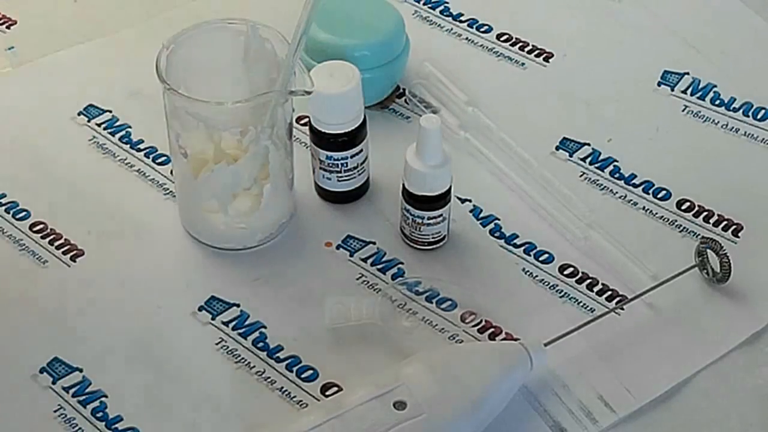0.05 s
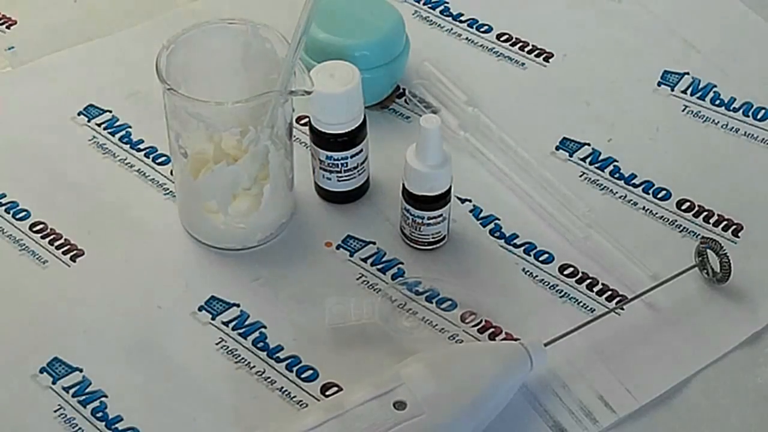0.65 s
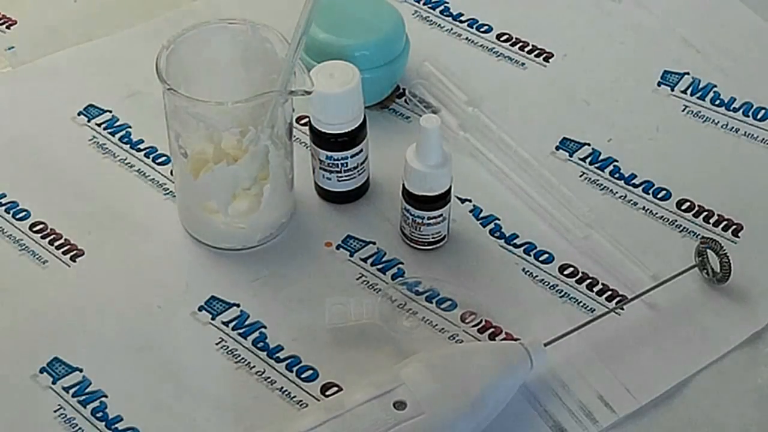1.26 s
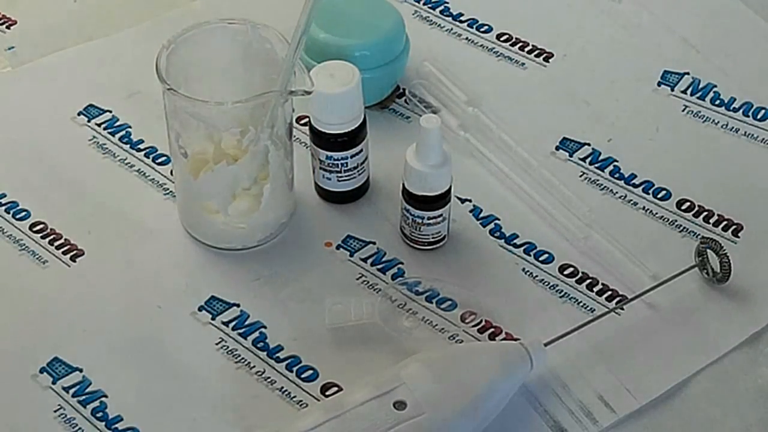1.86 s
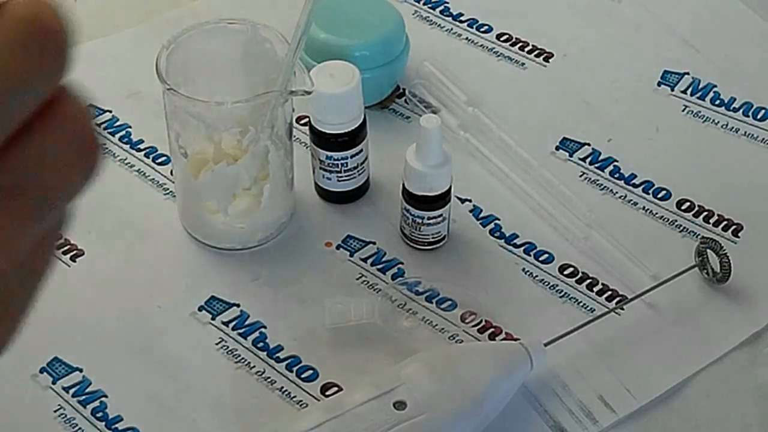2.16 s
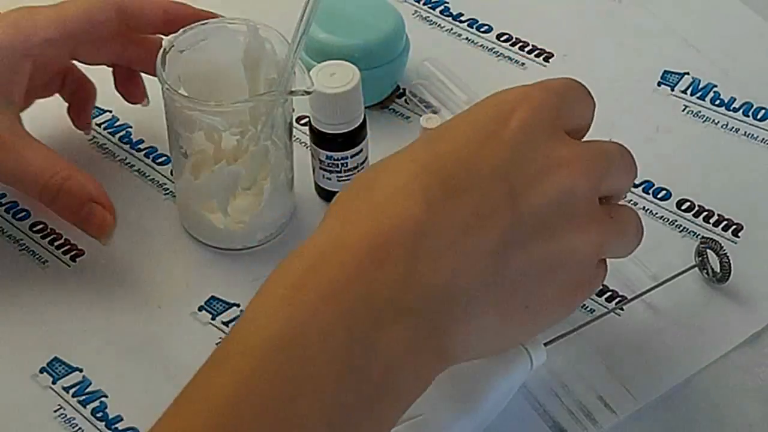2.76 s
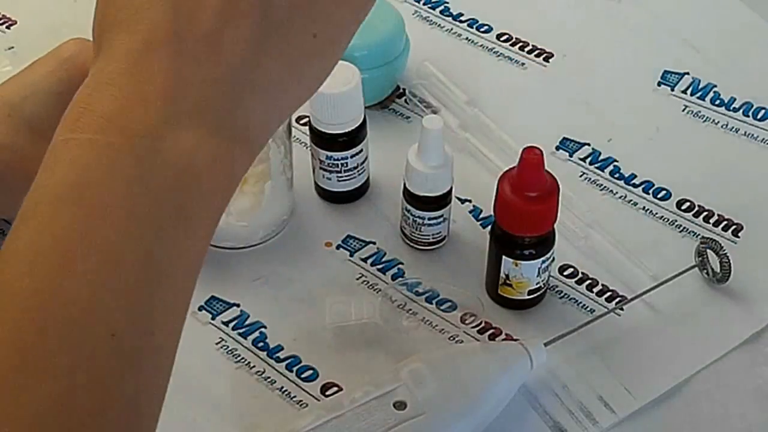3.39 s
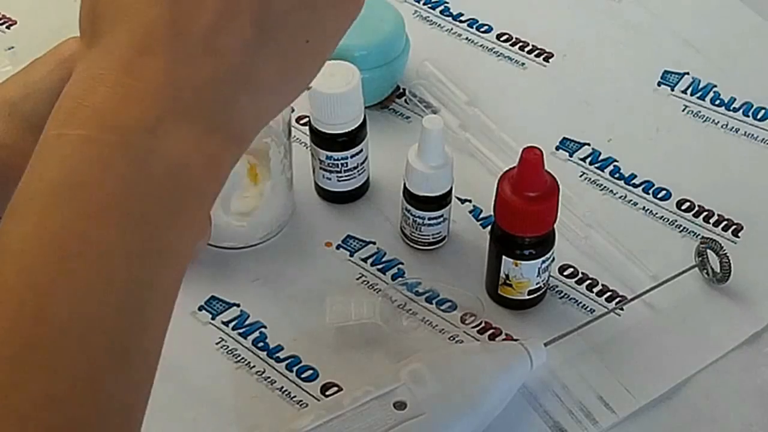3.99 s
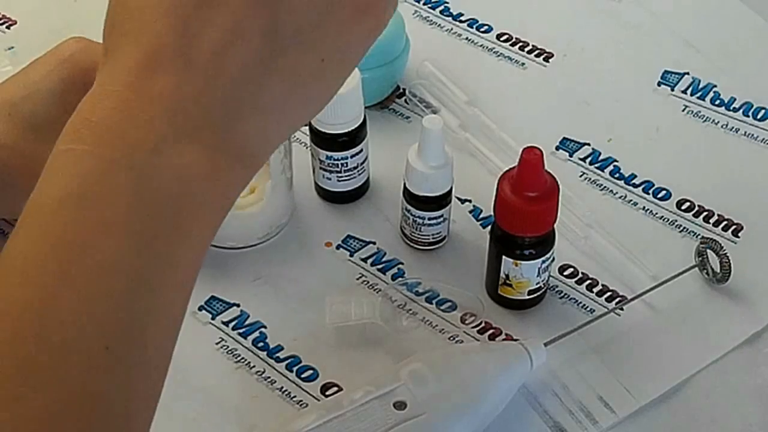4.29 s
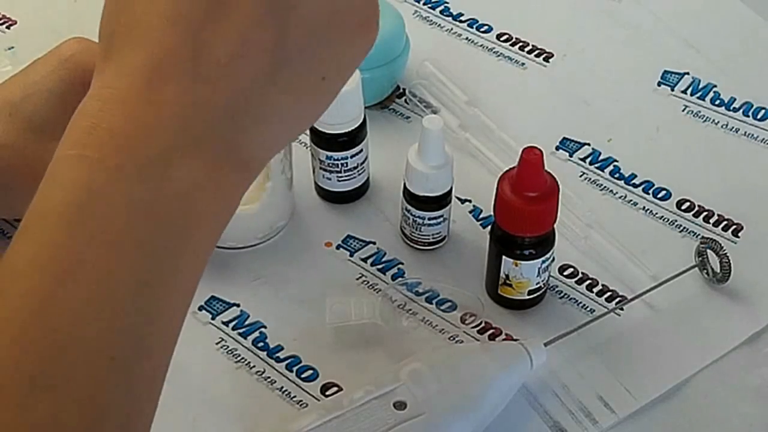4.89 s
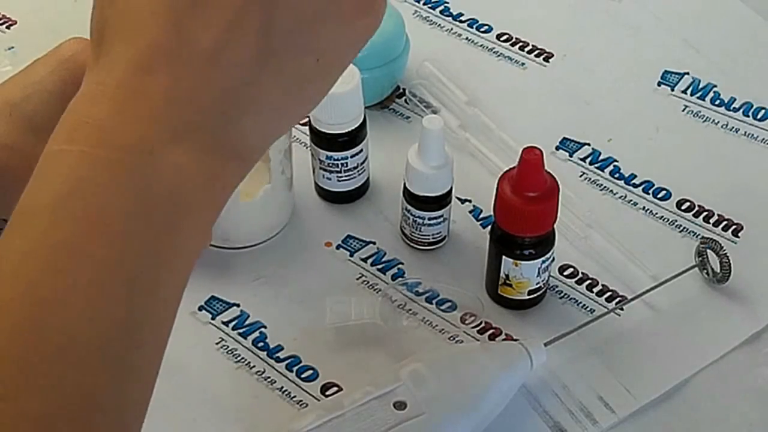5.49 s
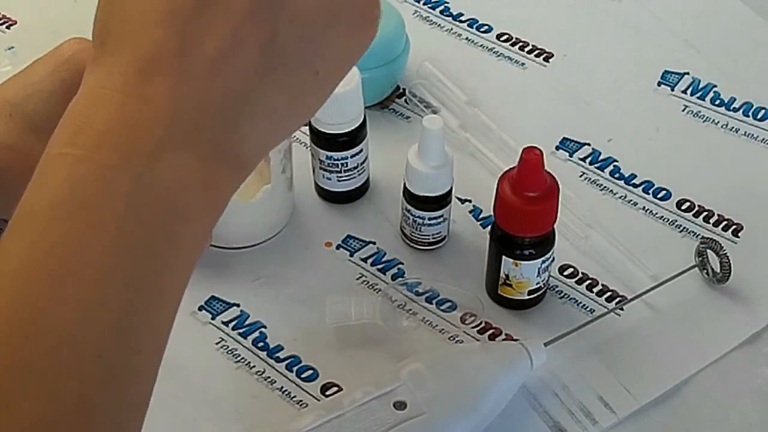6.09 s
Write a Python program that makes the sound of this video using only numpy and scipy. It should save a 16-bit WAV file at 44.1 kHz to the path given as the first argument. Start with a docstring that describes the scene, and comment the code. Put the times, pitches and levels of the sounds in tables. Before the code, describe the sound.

Small bottles are handled on a table, heard close up in a small room with a short echo, faint hiss and softened treble. Sleeves rustle quietly throughout. A soft thud comes at 0.2 seconds, then a few light clicks and tiny scrapes between 0.5 and 1.4 seconds. Near 2 seconds an arm passes with a faint, falling whoosh. Dull bumps and small taps follow from 2.3 to 3.5 seconds, with a slight low rumble from the table. At about 3.6 seconds a glass beaker is knocked with a clear, briefly ringing clink, and the heaviest thuds follow until 4.1 seconds. From 4.4 to 5.5 seconds caps and glass click busily among short, faintly squeaky scrapes, with a weak beaker clink near 4.5. A sharp click with a knock and a slight ring lands at 5.8 seconds, and a few lighter ticks follow just after 6.

```python
"""Small dropper bottles are handled beside a glass beaker on a paper-covered table, in a small room.
Sleeves rustle over a faint hiss. Caps and glass click as they meet, hands thud on the table, and
plastic and skin scrape in tiny slips. A leaning arm sways the table top, and near 2 s an arm whooshes
past. From about 3.6 s the beaker is knocked four times and rings on. The room echoes after each touch,
and a close microphone that loses the high treble hears it all."""
import sys
import numpy as np
from scipy import signal
from scipy.fft import rfft, irfft
from scipy.io import wavfile
from scipy.ndimage import uniform_filter1d

SR = 44100
rng = np.random.default_rng(int(sys.argv[2]) if len(sys.argv) > 2 else 0)


def to_wav(s):
    """Save 16-bit WAV."""
    ch = np.atleast_2d(s).T  # columns
    pcm = np.round(np.clip(ch, -1, 1) * 32767)  # PCM
    wavfile.write(sys.argv[1], SR, pcm.astype(np.int16))


N = 275625
TIME = np.arange(N) / SR

# Levels are relative. A ring time is how long a sound takes to fade by 60 dB.
# How briskly sleeves and skin move through the air and over paper: (time [s], level [dB])
RUSTLE_LEVELS = [(0, -90), (.25, -57.5), (.42, -65.5), (.6, -55), (1.02, -63), (1.45, -56), (1.72, -63),
                 (1.95, -60), (2.3, -59), (2.9, -59), (3.9, -55), (4.7, -60.5), (5.05, -55.5),
                 (5.32, -64.5), (5.5, -61), (5.68, -64), (5.9, -61), (6.25, -57)]
# The tone of that rustle: (frequency [Hz], level [dB])
RUSTLE_TONE = [(88, -43.5), (150, -6), (249, -20), (270, -18), (556, -7.5), (665, -14), (879, -5),
               (1020, -10), (1560, -3), (1840, -11), (2590, -9.5), (3310, -16.5), (7500, -24),
               (9750, -69.5), (16500, -120)]
# Borders of the seven bands that shape a click or scrape: (frequency [Hz])
BAND_EDGES = [360, 750, 1400, 2200, 3100, 3900, 4900, 7600]
# The tone all clicks and scrapes share, one row a band: (frequency [Hz], level [dB])
TOUCH_TONE = [(433, -5.33), (1025, -3), (1755, 0.93), (2610, -3.13), (3480, 0.5), (4370, -1.9),
              (6100, -1.97)]
# The notes of the handled glass: (frequency [Hz], level [dB], ring time [s])
GLASS_NOTES = [(1195, -23, 0.038), (1272, 2.5, 0.02), (1744, -28, 0.12), (1960, -8, 0.013),
               (2556, -3.5, 0.035), (2810, -2, 0.12), (3310, -24, 0.011), (4220, -1.5, 0.0089),
               (4470, -21.5, 0.09), (5246, 1, 0.0054), (6010, -25, 0.016), (6535, -4, 0.015)]
# Hard touches: (time [s], decay [s], level [dB], brightness [dB per octave], bass edge [Hz],
# lower note [Hz], its boost [dB], upper note [Hz], its boost [dB])
CLICK_EVENTS = [(0.052, 0.015, -83, 1.5, 200.0, 3770.0, 17, 4760, 21.5),
                (0.1839, 0.021, -57, 3.7, 200.0, 1900.0, 6.5, 3230, 6.2),
                (0.503, 0.0034, -60.5, -10.9, 2010.0, 2230.0, 10, 3662.0, 0),
                (0.5251, 0.00093, -34.8, -9.5, 2200, 1580.0, 10, 2340, 12.5),
                (0.7277, 0.00032, -64, 0, 200.0, 1540.0, 14.5, 2920.0, 8),
                (0.7683, 0.0019, -41, 1.9, 1070, 1690, 3, 2716, 8),
                (1.2104, 0.0089, -59.5, 0.9, 1070, 1230, 11, 1496, 7),
                (1.3681, 0.00077, -43.5, -5.5, 1190, 1950.0, -4.5, 4120, 4),
                (2.2828, 0.024, -58.5, 9.5, 200.0, 4160.0, -0.5, 6360.0, -5.5),
                (2.3793, 0.019, -53.5, 4.5, 200.0, 3670.0, 8.3, 4050, 4.5),
                (3.1069, 0.008, -45, 5.5, 230.0, 1930, 7, 4980, 4.5),
                (3.1758, 0.025, -54.5, 1, 480.0, 1970, 2, 5870, 6.7),
                (3.2686, 0.017, -53.0, 4, 450.0, 3940, 2, 6050, 0.5),
                (3.3607, 0.012, -51.1, 9.5, 200.0, 4100.0, 0.5, 5650, -7),
                (3.571, 0.0012, -30.5, 1, 715, 2828, 11.5, 4520, 5.5),
                (3.6352, 0.008, -43, -12.5, 1740.0, 1270, 4, 2770, 5.5),
                (3.722, 0.0081, -50, 3, 500.0, 1690, 5.6, 3900, -2),
                (3.86, 0.02, -63, 0, 200.0, 1215, 13.5, 3940, 6),
                (4.063, 0.0066, -49.5, -1.9, 585, 4790.0, 6, 5490, 10),
                (4.3876, 0.0075, -49, -2.5, 1490.0, 2470, 15, 5270, 11.5),
                (4.4611, 0.0041, -35.5, 1.1, 500.0, 1194, 4, 2470, 7.5),
                (4.568, 0.002, -34.5, -0.3, 1740, 3180, 0, 5040, 4),
                (4.6252, 0.00061, -42, 2.7, 380.0, 4190, 14, 5500, 10.5),
                (4.756, 0.0051, -41, -0.7, 1360.0, 2725, 8, 5330, 7.5),
                (4.767, 0.001, -41.5, -5.8, 1280.0, 2610, 12, 3480, -9),
                (4.9012, 0.0018, -42, 5, 200.0, 1040, 16, 2650, 14),
                (5.0152, 0.012, -43.5, 0.9, 880, 3320, 2, 5180, 4.5),
                (5.1181, 0.0075, -58.5, 0, 595, 1100, 19, 1670, 8.5),
                (5.2565, 0.011, -51.5, 1.3, 1080.0, 1747.0, 7.5, 5080, 8),
                (5.371, 0.011, -50.5, 1, 1000, 1547, 4.5, 3470, -3),
                (5.459, 0.0012, -61.5, 13, 580.0, 1750.0, 20.0, 4830, 8),
                (5.7852, 0.0037, -31, 1.75, 362, 1184, 3, 2840, 2),
                (6.0553, 0.0054, -40, 1.5, 980.0, 1400, 1, 5100, 8),
                (6.172, 0.0021, -43, -0.7, 1890, 3300.0, -2, 5050, 3.8),
                (6.229, 0.0017, -48, -2.2, 740.0, 1960.0, -3.5, 5300, 4)]
# Soft blows on the table: (time [s], swell [s], thud [Hz], thud level [dB], knock [Hz], knock level [dB])
THUD_EVENTS = [(0.177, 0.024, 103.6, -48, 190, -38), (0.195, 0.017, 71.4, -40.5, 280, -44.5),
               (1.093, 0.021, 243.4, -55, 255, -71), (1.144, 0.026, 237.4, -58, 129, -54),
               (2.283, 0.0078, 69.6, -47, 446, -47), (2.383, 0.012, 75, -51, 405, -45.5),
               (2.583, 0.0084, 78, -37, 398, -36.5), (2.669, 0.01, 155, -37.5, 408, -32),
               (2.676, 0.011, 107, -38.5, 250, -47), (3.146, 0.0064, 93, -38, 446, -43.5),
               (3.27, 0.012, 87, -40.5, 450, -55.5), (3.362, 0.013, 83, -43.5, 450, -45),
               (3.521, 0.031, 80, -48, 620, -56), (3.662, 0.0069, 70, -60, 410, -36.5),
               (3.679, 0.0079, 90, -25.5, 266, -33), (3.746, 0.0075, 79, -27.5, 388, -36),
               (3.869, 0.011, 64.6, -34, 770, -47), (3.901, 0.013, 98, -32, 440, -54),
               (3.931, 0.012, 65, -33, 610, -51), (4.017, 0.015, 96.5, -29.5, 420, -47.5),
               (4.06, 0.01, 75, -38.5, 437, -70), (4.456, 0.027, 90, -42, 278, -52),
               (4.675, 0.024, 77, -48, 395, -62), (4.766, 0.015, 87, -50, 287, -49),
               (5.469, 0.014, 71, -49, 398, -54), (5.785, 0.0084, 107, -52, 766, -36.5),
               (5.79, 0.014, 70, -53, 517, -45)]
# Plastic and skin sliding: (start [s], end [s], level [dB], brightness [dB per octave],
# bass edge [Hz], squeak boost [dB], squeak [Hz])
SCRAPE_EVENTS = [(0.515, 0.529, -43.5, -8.5, 1640, 6, 2240.0), (0.755, 0.776, -48.5, -2.2, 735, 6.5, 1780),
                 (1.059, 1.246, -78.5, 6, 201, 16.5, 1660.0),
                 (2.557, 2.592, -60.5, -2.5, 200.0, 0.5, 760.0),
                 (2.588, 2.606, -49.5, -7.0, 764, 4.5, 690.0), (3.525, 3.547, -57.5, -7, 537, 8.5, 630),
                 (3.739, 3.756, -49.5, -0.8, 420.0, 5, 1280), (4.069, 4.109, -59, 2.8, 530.0, 16, 3100),
                 (4.59, 4.598, -60, -1.5, 1000.0, 16, 3000), (4.776, 4.8, -46, -4.5, 1820, 11.5, 2530),
                 (4.799, 4.821, -48.5, 5.5, 200.0, 14, 1750), (4.828, 4.85, -48.5, 4, 660.0, 8.5, 4140),
                 (4.939, 4.956, -54.5, -5.5, 1570.0, 14, 4580.0), (5.148, 5.224, -56, 1, 473, -6, 1250),
                 (5.385, 5.501, -57, -1.6, 1140.0, 3.5, 4800)]
# An arm leans on the table: (start [s], end [s], level [dB])
ARM_LEANS = [(1.1, 1.587, -57.5), (2.25, 2.63, -52.5), (2.994, 3.55, -55), (3.606, 4.032, -48),
             (4.122, 4.512, -57), (4.62, 4.814, -53), (5.834, 6.042, -72)]
# An arm sweeps past the microphone: (time [s], level [dB], whoosh pitch [Hz])
SWEEP_PATH = [(1.8, -88, 641), (1.977, -59, 550), (2.098, -63.5, 510), (2.24, -64, 447), (2.36, -66, 404)]
# The brushing that goes with it: (frequency [Hz], width [Hz], level [dB])
SWEEP_BRUSHING = [(885, 40, -5), (1540, 91, -7.5), (2656, 32, -7)]
# Knocks against the beaker: (time [s], level [dB])
BEAKER_HITS = [(3.572, -27), (3.638, -47.5), (4.462, -52), (5.788, -50)]
# The notes of the beaker: (frequency [Hz], level [dB], ring time [s])
BEAKER_NOTES = [(1137, -5, 0.25), (1220, -3.5, 0.15), (2650, -12.5, 0.18), (2860, -1.5, 0.16),
                (3000, 1, 0.16), (2920, -5.5, 0.14), (3153, -14, 0.28), (4290, -24.5, 0.2),
                (4520, -4.5, 0.1)]
# The tone of the room's echo: (frequency [Hz], level [dB])
ROOM_TONE = [(100, 9.5), (400, 8), (1100, 9), (2000, 0), (3000, 0), (4500, -2.5), (7000, -4.5)]
# How long the room rings: (frequency [Hz], ring time [s])
ROOM_RING_TIMES = [(200, 0.66), (530, 0.48), (1400, 0.31), (3500, 0.43), (7000, 0.42)]
# Pitches the room favours: (frequency [Hz], width [Hz], boost [dB])
ROOM_RESONANCES = [(430, 44, 9.8), (810, 32, 4.9), (1176, 68, 5.4), (2420, 86, 1)]
# The whole sound dips briefly: (start [s], end [s], level change [dB])
LEVEL_DIPS = [(0, 0.05, -20), (0.466, 0.496, -14), (5.713, 5.759, -22.5)]


def amp(db):
    """Turns decibels into a number to multiply by."""
    return 10 ** (np.asarray(db) / 20)


def unit(x):
    """Scales a signal to an average strength (rms) of 1."""
    return x / np.sqrt(np.mean(x ** 2) + 1e-20)


def look_up(points, hz):
    """Reads between the rows of a (frequency, value) table, with octaves evenly spaced."""
    row_hz, value = np.transpose(points)
    return np.interp(np.log(hz + 1), np.log(row_hz), value)


def add(mix, start_s, sound):
    """Mixes a sound in at the given time."""
    part = mix[max(round(start_s * SR), 0):][:len(sound)]
    part += sound[:len(part)]


def resonate(x, hz, width_hz):
    """Makes x ring at one pitch; the narrower the width, the longer it rings."""
    fade = np.exp(-np.pi * width_hz / SR)
    return 2 * signal.lfilter([1 - fade], [1, -fade * np.exp(2j * np.pi * hz / SR)], x).real


def narrow(x, hz, width_hz):
    """Resonates twice, leaving little but a narrow band."""
    return resonate(resonate(x, hz, width_hz), hz, width_hz)


def rustle(patchy_db=4, level_db=-2):
    """Sleeves and skin rustle softly, with the patchy flutter that a noise suppressor gives."""
    hz, _, spectra = signal.stft(rng.standard_normal(N), SR, nperseg=1024, noverlap=768)
    patch_shape = np.ones((3, 14))  # frequency steps by time steps
    patches = unit(signal.convolve2d(rng.standard_normal(spectra.shape), patch_shape, "same"))
    spectra *= amp(look_up(RUSTLE_TONE, hz)[:, None] + patchy_db * patches)
    rubbing = signal.istft(spectra, SR, nperseg=1024, noverlap=768)[1][:N]
    return amp(level_db + np.interp(TIME, *np.transpose(RUSTLE_LEVELS))) * unit(rubbing)


def band_of(hz):
    """Finds which of the seven bands holds a frequency."""
    return np.searchsorted(BAND_EDGES[1:-1], hz)


def touch_bands(db, brightness, bass_hz, notes, bass_cut_db_per_octave=19):
    """Band levels of one touch: a harder one is brighter, and a smaller part has less bass."""
    hz, shared_db = np.transpose(TOUCH_TONE)
    octaves_below = np.logaddexp2(0, 6 * np.log2(bass_hz / hz)) / 6  # eases to 0 above the bass edge
    band_db = db + shared_db + brightness * np.log2(hz / 2500) - bass_cut_db_per_octave * octaves_below
    for note_hz, boost_db in notes:
        band_db[band_of(note_hz)] += boost_db
    return band_db


def shape_tone(x, band_db, seconds, size=8192):
    """Where a thing is touched sets its tone: steers the opening seconds of x toward the band levels."""
    hz, spectrum = np.fft.rfftfreq(size, 1 / SR), rfft(x, size)
    bands = [irfft(spectrum * ((hz >= lo) & (hz < hi))) for lo, hi in zip(BAND_EDGES, BAND_EDGES[1:])]
    strengths = [np.std(band[:round(seconds * SR)]) for band in bands]
    gain = (amp(band_db) / strengths)[band_of(hz)]
    bass_cut = hz ** 4 / (hz ** 4 + BAND_EDGES[0] ** 4)
    log_gain = uniform_filter1d(np.log(gain * bass_cut + 1e-9), 41)
    mirrored = np.r_[log_gain, log_gain[-2:0:-1]]
    response = np.exp(np.conj(signal.hilbert(mirrored)))  # so nothing rings before x starts
    return irfft(spectrum * response[:len(hz)])


def glass(force, direct_db):
    """A force is heard directly and through the notes it wakes in the glass."""
    ringing = sum(amp(db) * resonate(force, hz, np.log(1000) / np.pi / ring_s)
                  for hz, db, ring_s in GLASS_NOTES)
    return amp(direct_db) * force + ringing


def held_part(force, notes_hz, direct_db, grip_width_hz=415, grip_db=-7.5):
    """A held part is struck: the glass answers, and fingers damp the part's own notes into broad ones."""
    damped = sum(unit(resonate(force, hz, grip_width_hz)) for hz in notes_hz)
    return unit(glass(force, direct_db)) + amp(grip_db) * damped


def clicks(direct_db=-8, pre_echo_db=-22, pre_echo_s=0.0034, note_db=-4, chatter_db=-2, size=4096):
    """Caps and glass chatter, with a faint pre-echo just before each click. Returns chatter and notes."""
    chatter, notes, t = np.zeros(N), np.zeros(N), np.arange(size) / SR
    for start, decay, db, brightness, bass_hz, low_hz, low_boost, high_hz, high_boost in CLICK_EVENTS:
        grit, pre_echo_noise = rng.standard_normal((2, size))
        band_db = touch_bands(db, brightness, bass_hz, [(low_hz, low_boost), (high_hz, high_boost)])
        attack = 1 - np.exp(-t / (0.00023 + decay / 10))  # a longer touch starts more gently
        contact = held_part(grit * attack * np.exp(-t / decay), [low_hz, high_hz], direct_db)
        add(chatter, start, shape_tone(contact, band_db, seconds=0.01))
        pre_echo = glass(pre_echo_noise * t * (t < pre_echo_s), direct_db)
        add(chatter, start - pre_echo_s, amp(pre_echo_db) * shape_tone(pre_echo, band_db, pre_echo_s))
        firmness_db = 0.18 * (db + 43)  # a firmer touch rings more
        ring_s = 0.027 + 2 * decay
        for hz in low_hz, high_hz:
            note = attack * np.sin(2 * np.pi * hz * t) * amp(-60 * t / ring_s)
            note /= np.std(note[:SR // 100])
            add(notes, start, amp(band_db[band_of(hz)] + note_db + firmness_db) * note)
    return amp(chatter_db) * chatter, notes


def thuds(knock_width_hz=220, legs_hz=30, legs_db=-5, size=16384):
    """A soft blow swings the table top and rocks its legs, while an object on it gives a dull knock."""
    out, t = np.zeros(N), np.arange(size) / SR
    for start, swell, thud_hz, thud_db, knock_hz, knock_db in THUD_EVENTS:
        push = (t / swell * np.exp(1 - t / swell)) ** 2
        knock = push * narrow(rng.standard_normal(size), knock_hz, knock_width_hz)
        knock = unit(knock) * np.sqrt(np.mean(push ** 2) / 2)  # as strong as a tone under this push
        swing = np.sin(2 * np.pi * thud_hz * t) + amp(legs_db) * np.sin(2 * np.pi * legs_hz * t)
        add(out, start, amp(thud_db) * push * swing + amp(knock_db) * knock)
    return out


def scrapes(slips_per_s=1200, spread_db=4, squeak_db=-3, level_db=-1, size=7168):
    """Plastic and skin slide in tiny, uneven slips that shake the glass and squeak faintly."""
    out, t = np.zeros(N), np.arange(size) / SR
    for start, end, db, brightness, bass_hz, boost_db, squeak_hz in SCRAPE_EVENTS:
        band_db = touch_bands(db, brightness, bass_hz, [(squeak_hz, boost_db)])
        slips = (rng.random(size) < slips_per_s / SR) * rng.standard_normal(size)
        slips *= amp(spread_db * rng.standard_normal(size))
        length = end - start
        stroke = np.sqrt(np.clip(np.sin(np.pi * np.minimum(t / length, 1)), 0, 1))
        force = (slips + 0.14 * rng.standard_normal(size)) * stroke
        squeak = unit(resonate(force, squeak_hz, width_hz=130))
        slide = unit(glass(force, direct_db=-12)) + amp(squeak_db) * squeak
        add(out, start, shape_tone(slide, band_db, length))
    return amp(level_db) * out


def table_sway(settle_s=0.06, fade_db_per_s=77, resting_db=-77.5, upper_db=-6):
    """The table top's two lowest notes swell as an arm leans on it and sink back when the arm lifts."""
    pressure = rng.standard_normal(N)
    lower = unit(narrow(pressure, hz=60, width_hz=14))
    upper = unit(narrow(pressure, hz=92, width_hz=98.6))
    strength = np.full(N, amp(resting_db))
    for start, end, db in ARM_LEANS:
        settling = np.clip((TIME - start) / settle_s, 0, 1)
        strength += settling * amp(db - fade_db_per_s * np.maximum(TIME - end, 0))
    return strength * unit(lower + amp(upper_db) * upper)


def arm_sweep(width_hz=100):
    """A passing arm stirs the air into a hollow whoosh that falls in pitch, with higher brushing."""
    times, db, hz = np.transpose(SWEEP_PATH)
    air = rng.standard_normal(N)
    cycles = np.cumsum(np.interp(TIME, times, hz)) / SR
    whoosh = unit(narrow(air, 0, width_hz) * np.sin(2 * np.pi * cycles))
    brushing = sum(amp(peak_db) * unit(narrow(air, peak_hz, width))
                   for peak_hz, width, peak_db in SWEEP_BRUSHING)
    passing = (TIME > times[0]) & (TIME < times[-1])
    return (whoosh + brushing) * amp(np.interp(TIME, times, db)) * passing


def beaker():
    """The knocked beaker stands free, so it rings longer than anything held in the fingers."""
    out, t = np.zeros(N), TIME[:SR // 2]
    for start, db in BEAKER_HITS:
        for hz, note_db, ring_s in BEAKER_NOTES:
            add(out, start, amp(db + note_db - 60 * t / ring_s) * np.sin(2 * np.pi * hz * t))
    return out


def room(x, tail_db=-5, early_db=-8, early_ring_s=0.045, echoes_per_s=2000, gap_s=0.0018):
    """Quick echoes come off nearby things, then blur into a tail that lasts longest in the bass."""
    t = TIME[:SR]
    hz, frame_s, spectra = signal.stft(rng.standard_normal(SR), SR, nperseg=256)
    spectra *= amp(-60 * frame_s / look_up(ROOM_RING_TIMES, hz)[:, None])
    tail = signal.istft(spectra, SR, nperseg=256)[1][:SR] * np.clip(t / gap_s - 1, 0, 1)
    hz = np.fft.rfftfreq(SR, 1 / SR)
    peaks_db = sum(db / (1 + (2 * (hz - peak_hz) / width) ** 2) for peak_hz, width, db in ROOM_RESONANCES)
    tail = irfft(rfft(unit(tail)) * amp(look_up(ROOM_TONE, hz) + peaks_db), SR)
    tail *= (t > gap_s) & (t < 0.9)
    early = rng.standard_normal(SR) * (rng.random(SR) < echoes_per_s / SR)
    early *= (t > gap_s / 2) * amp(-60 * t / early_ring_s)
    echoes = amp(tail_db) * tail + amp(early_db) * unit(early)
    return signal.fftconvolve(x, echoes)[:N] / np.sqrt(SR)


def table_bounce(x, delay_s=0.000677, share=0.3):
    """A sound meets its own reflection off the table top, which weakens evenly spaced frequencies."""
    return (x + share * np.interp(TIME - delay_s, TIME, x)) / np.hypot(1, share)


def suppress_noise(x, threshold_db=-90, floor_db=-12):
    """A noise suppressor turns down each narrow band that is near or below its threshold."""
    spectra = signal.stft(x, SR, nperseg=1024, noverlap=768)[2]
    power = abs(uniform_filter1d(abs(spectra) ** 2, 3, axis=-1))
    gain = np.maximum(power / (power + amp(threshold_db) ** 2), amp(floor_db))
    return signal.istft(spectra * gain, SR, nperseg=1024, noverlap=768)[1][:, :N]


def dips(fall_s=0.025, return_s=0.005):
    """The level sinks briefly at each dip and comes back quickly."""
    change_db = np.zeros(N)
    for start, end, db in LEVEL_DIPS:
        inside = np.minimum((TIME - start) / fall_s, (end - TIME) / return_s)
        change_db += db * np.clip(inside + 0.5, 0, 1)
    return amp(change_db)


def scene():
    """Mixes the touches and their echoes with the quiet motion of arms and table, in one channel."""
    chatter, notes = clicks()
    touches, blows = chatter + scrapes(), thuds()
    echoes = room(touches + amp(-19.5) * notes + amp(-15.5) * blows)
    motion = table_sway() + rustle() + arm_sweep()
    return (table_bounce(touches) + notes + blows + beaker() + echoes + motion)[None]


def record(dry, mic_top_hz=7150, hiss_db=-71.5, hiss_top_hz=15800):
    """The microphone turns down weak noise and cuts high treble; its electronics add a wide hiss."""
    mic_filter = signal.firwin(161, mic_top_hz, window=("kaiser", 7), fs=SR)
    final_filter = signal.firwin(511, hiss_top_hz, window=("kaiser", 9), fs=SR)
    heard = signal.oaconvolve(suppress_noise(dry), mic_filter[None], "same")
    heard = dips() * (heard + amp(hiss_db) * rng.standard_normal(N))
    return signal.oaconvolve(heard, final_filter[None], "same")


dry = scene()
out = record(dry)
to_wav(out)
```